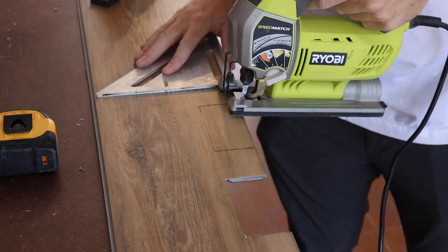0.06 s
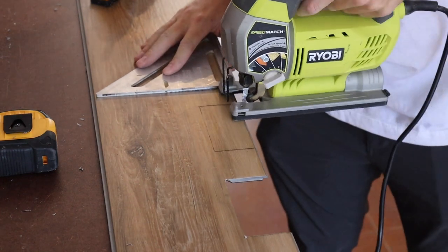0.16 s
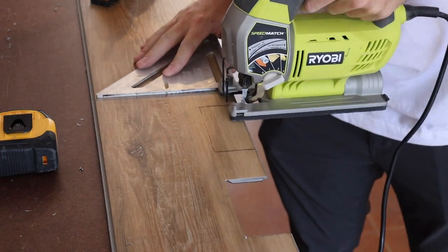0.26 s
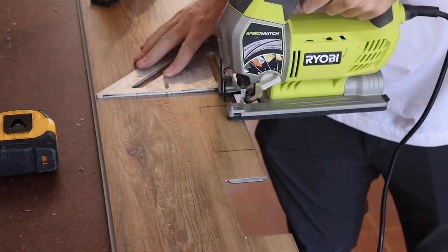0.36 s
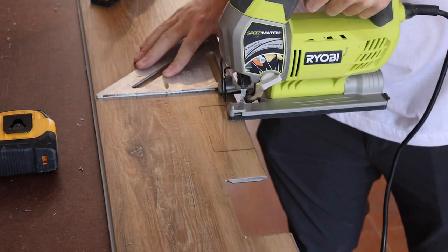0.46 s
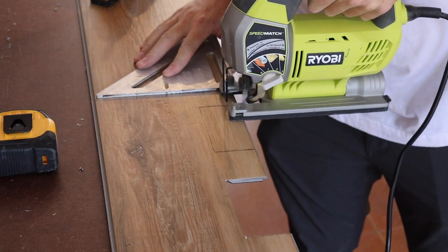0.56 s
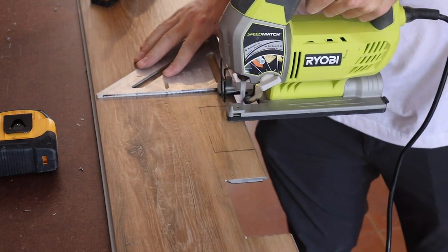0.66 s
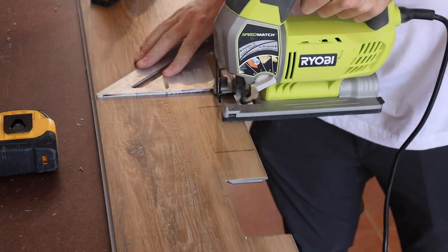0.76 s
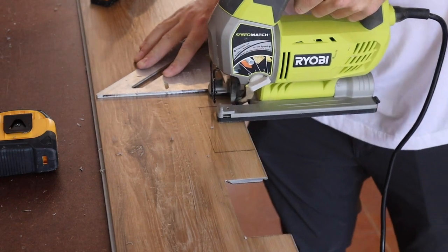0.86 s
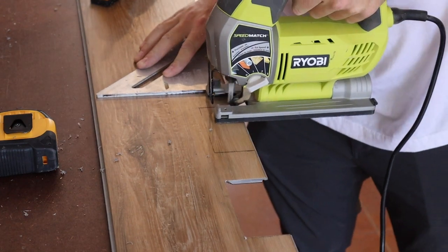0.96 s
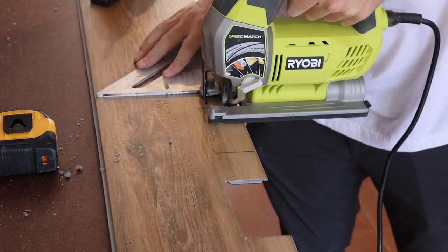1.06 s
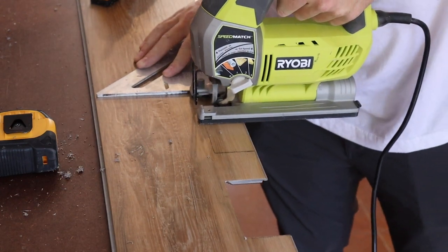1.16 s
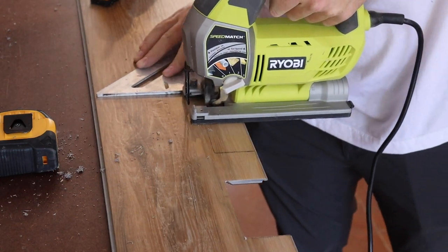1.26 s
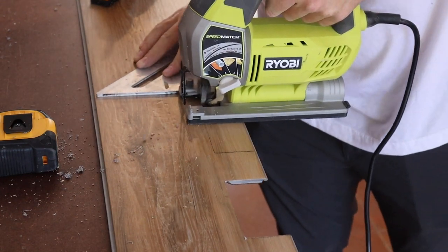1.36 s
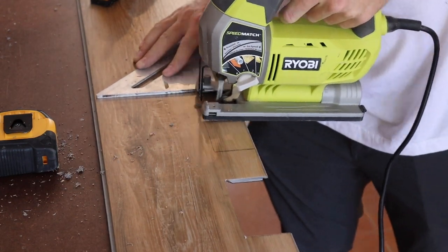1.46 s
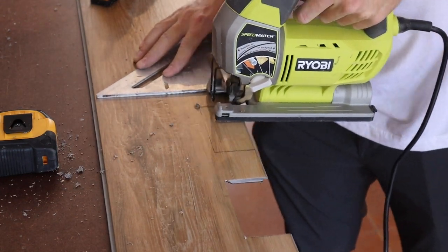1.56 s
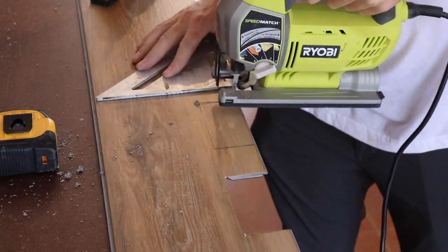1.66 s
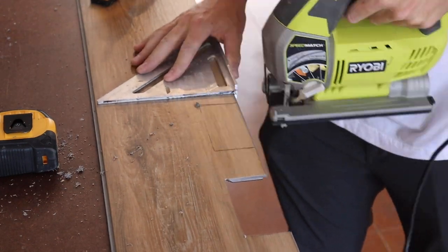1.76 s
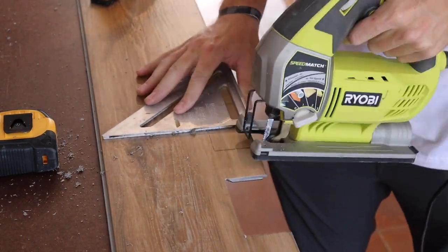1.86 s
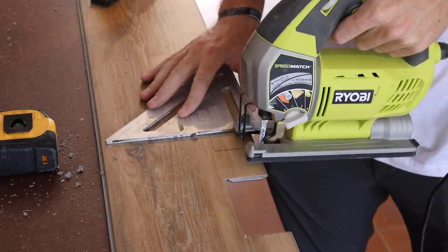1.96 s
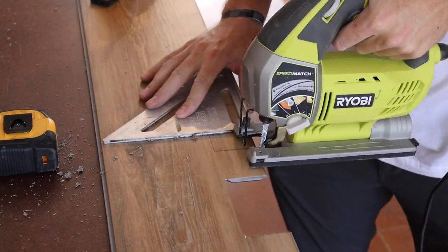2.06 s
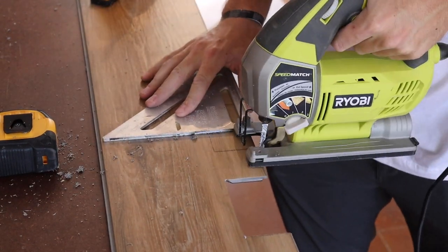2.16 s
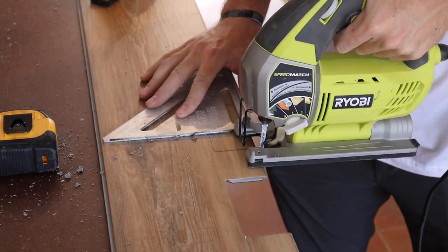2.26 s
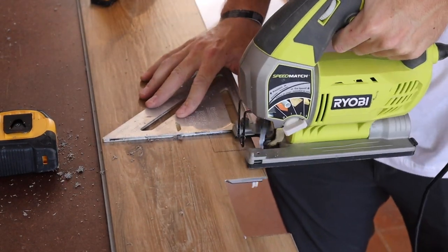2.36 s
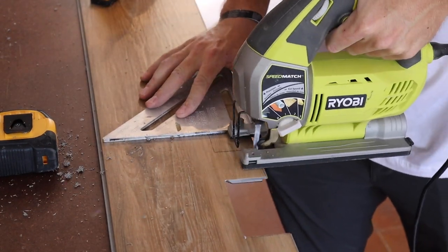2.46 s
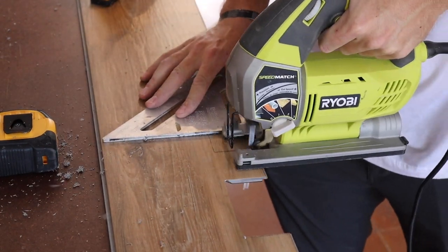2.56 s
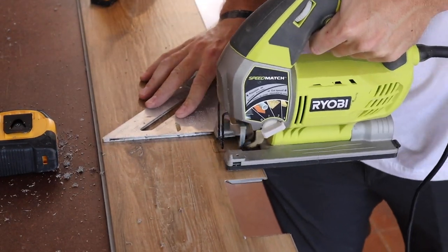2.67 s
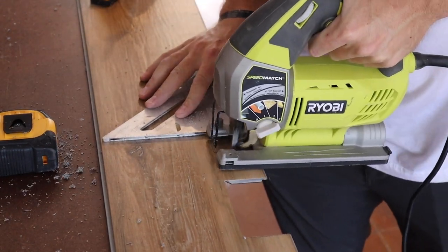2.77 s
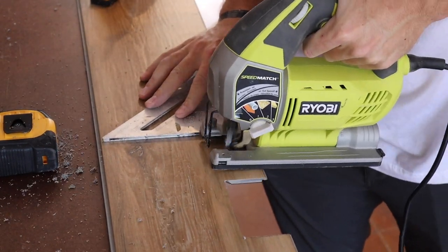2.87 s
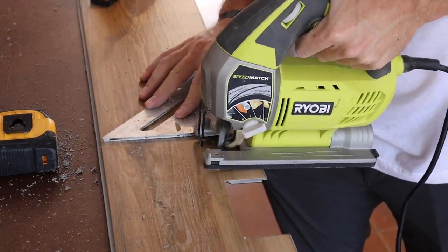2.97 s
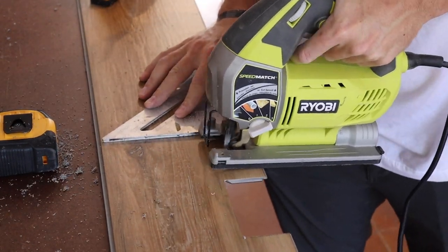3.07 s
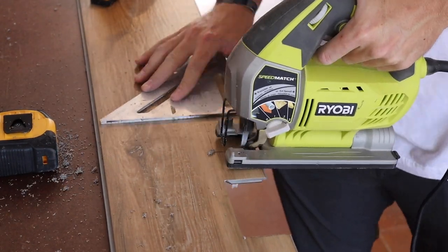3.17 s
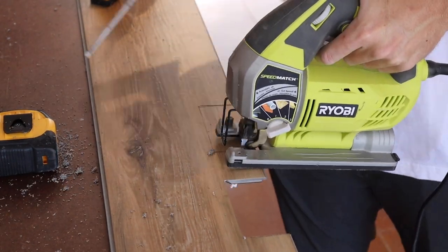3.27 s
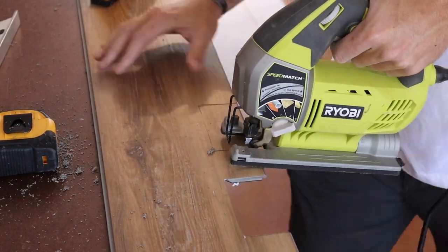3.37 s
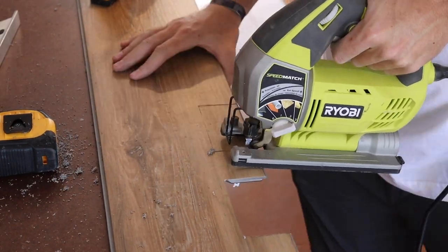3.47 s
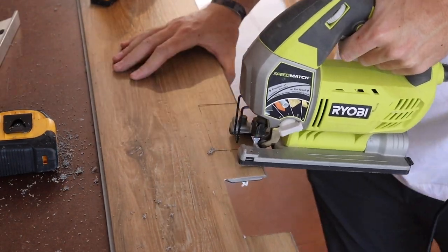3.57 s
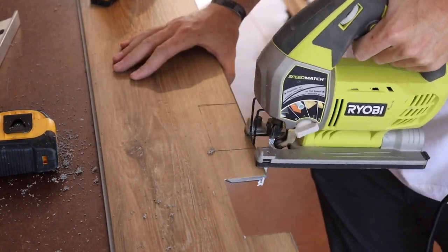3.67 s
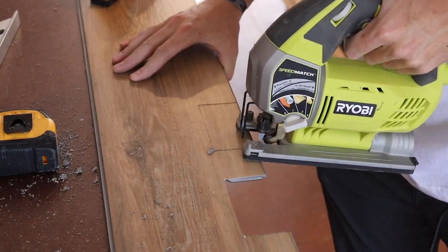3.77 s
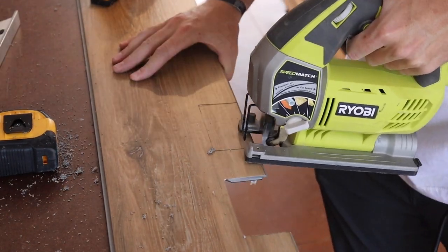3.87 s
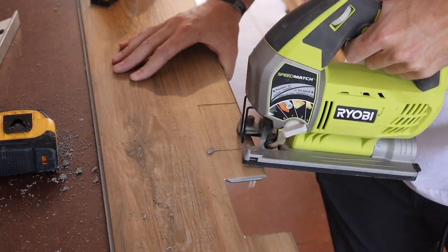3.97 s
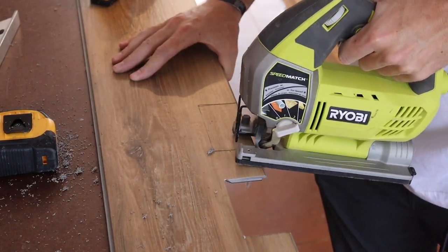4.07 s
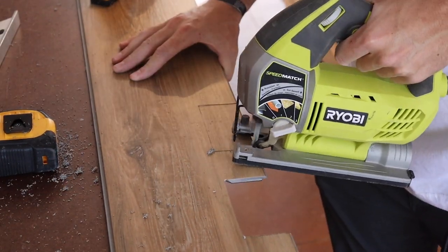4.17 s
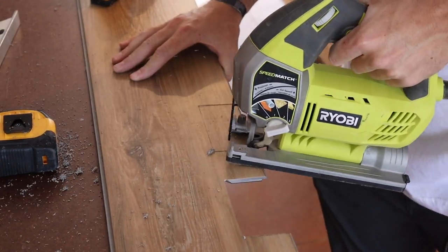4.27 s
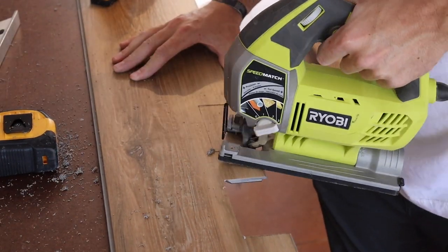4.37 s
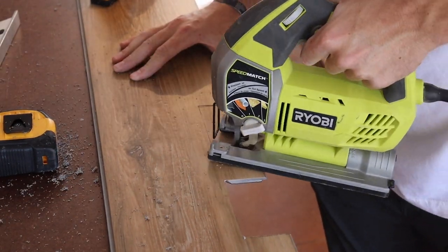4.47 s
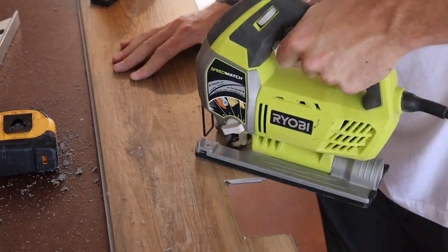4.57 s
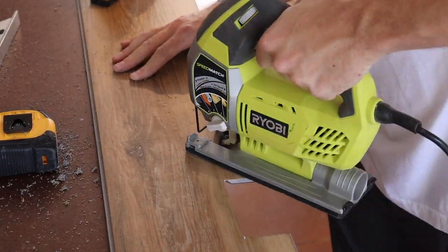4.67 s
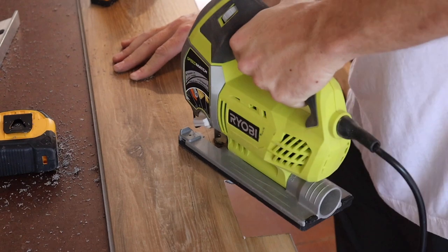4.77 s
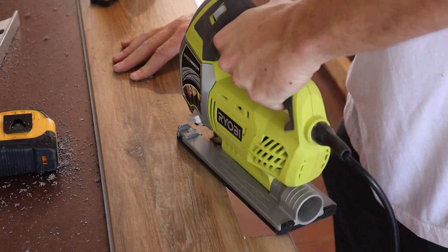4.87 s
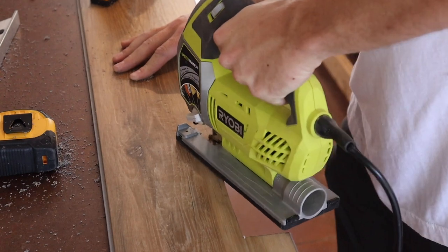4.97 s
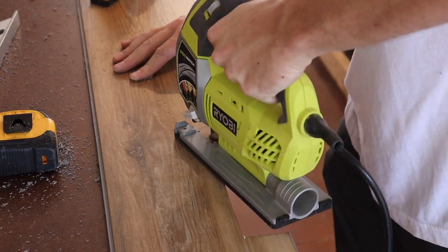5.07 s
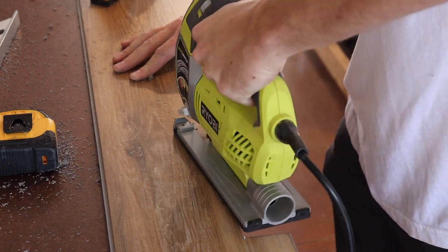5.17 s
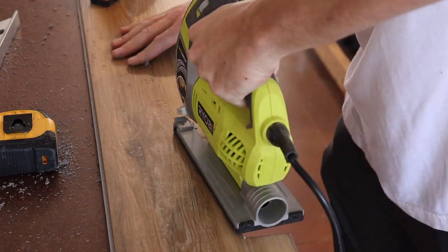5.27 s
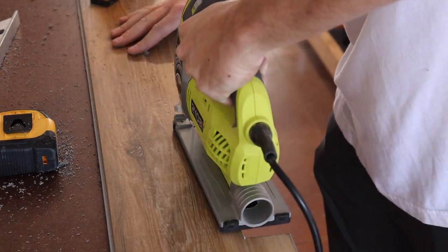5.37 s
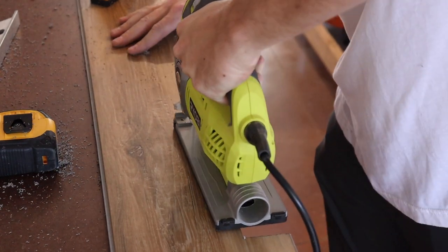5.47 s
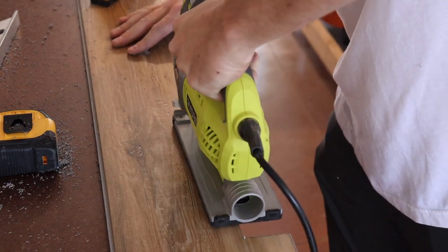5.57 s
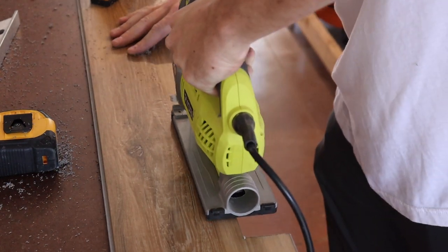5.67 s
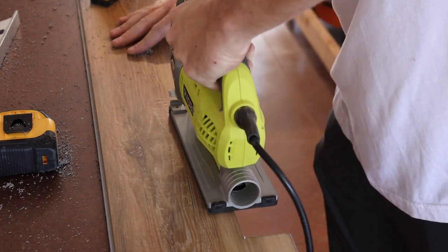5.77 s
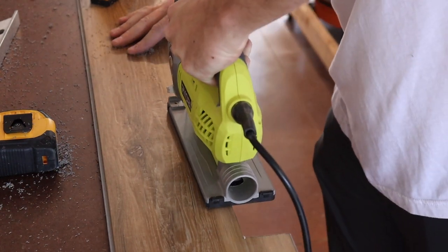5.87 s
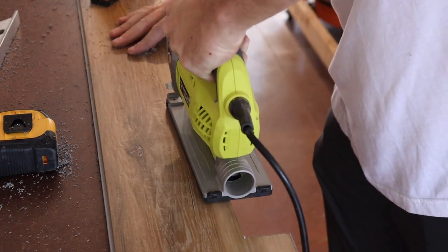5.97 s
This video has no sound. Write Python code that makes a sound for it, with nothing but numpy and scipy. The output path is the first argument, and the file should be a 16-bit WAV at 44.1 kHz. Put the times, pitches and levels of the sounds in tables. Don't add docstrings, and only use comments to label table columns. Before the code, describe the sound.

Faint handling ticks come first, then a jigsaw snaps on, rasps into a vinyl plank and winds down. Clicks and light rubbing follow, then a second, shorter cut, a sharp clack with a brief scrape, and softer taps. A third long cut labours lower, clacks once midway, and keeps buzzing. Recorded at arm's length, nearly centred, with little room echo.

```python
import sys
import numpy as np
from scipy import signal
from scipy.io import wavfile
from scipy.ndimage import uniform_filter1d

SR = 44100
rng = np.random.default_rng(int(sys.argv[2]) if len(sys.argv) > 2 else 0)


def amplitude_ratio(level_db):
    exponent = np.asarray(level_db, float) / 20
    return 10 ** exponent


def to_wav(sig):
    pcm = np.clip(np.atleast_2d(sig), -1, 1) * 32767
    pcm = np.round(pcm).astype(np.int16)
    wavfile.write(sys.argv[1], SR, pcm.T)


N = 265041
T = np.arange(N) / SR
FRAME_T, BIN_HZ = np.arange(N // 128 + 5) * 128 / SR, np.fft.rfftfreq(512, 1 / SR)

# pressed t/s, released t/s, coasting/s, fan hiss level/dB, gear whine level/dB
BURSTS = [
    (.607, 1.475, .32, -30.5, -38),
    (2.356, 3.1, .305, -30, -44.5),
    (3.899, 7, .3, -30, -39),
]
FREE_HZ = 280

# f/Hz, level/dB, t60/s
BENCH = [
    (435, 0, .27),
    (595, -2, .09),
    (330, -9, .04),
    (505, -8, .05),
]


def evened(x):
    return x / np.sqrt(np.mean(x ** 2) + 1e-20)


def read(points, at):
    f, value = np.transpose(points)
    return np.interp(np.log(at + 1), np.log(f + 1), value)


def band(x, lo_hz, hi_hz):
    edges = np.clip([lo_hz, hi_hz], 10, 21000)
    return signal.sosfilt(signal.butter(3, edges, "band", fs=SR, output="sos"), x)


def resonate(x, hz, width):
    turn = np.exp(2j * np.pi * np.cumsum(hz * np.ones(len(x))) / SR)
    r = np.exp(-np.pi * width / SR)
    return 2 * (turn * signal.lfilter([1 - r], [1, -r], x / turn)).real


def wander(t, per_s):
    steps = uniform_filter1d(rng.standard_normal(450), size=3)
    return evened(np.interp(t, np.arange(450) / per_s, steps))


def swell(t, start, end, fade_s):
    return np.clip(np.minimum(t - start, end - t) / fade_s, 0, 1)


def noise(db, patchy_db):
    a, b, patches = rng.standard_normal((len(FRAME_T), len(BIN_HZ), 3)).T
    patches = uniform_filter1d(patches, size=5, axis=0)
    patches = evened(uniform_filter1d(patches, size=20, axis=1))
    field = (a + 1j * b) * amplitude_ratio(db + patchy_db * patches)
    return signal.istft(field, nperseg=512, noverlap=384)[1][:N]


def drive(on, off, coast):
    # t/s, stroke rate f/Hz, push on the plank level/dB, gear load level/dB
    cuts = [
        [(.75, 291, -66, 2.5), (.85, 289, -65, -3.5), (.93, 283.5, -64, 0.5), (1.1, 283.7, -57.5, -0.5),
         (1.21, 273.2, -53, 2), (1.31, 273, -51, -3.5), (1.48, 280.4, -56.5, -2)],
        [(2.5, 284.7, -63.5, 6), (2.57, 282.2, -59.5, -5), (2.64, 279.4, -54, 3), (2.72, 274.9, -52, 3.5),
         (2.87, 273.2, -47, -1), (3.05, 271.3, -47.5, 3.5), (3.1, 273.7, -54.5, -3)],
        [(4.1, 282.3, -76, -1.5), (4.23, 280, -85, -10), (4.31, 276.9, -57, -2.5), (4.5, 270.2, -47, 1.5),
         (4.6, 267.4, -46.5, 3.5), (4.68, 261.6, -55, -5), (4.77, 261.3, -53.5, -5), (4.86, 251.8, -56.5, -9)],
        [(4.94, 253, -56.5, -4), (5.04, 271.2, -59, -1), (5.13, 273.3, -59, -2.5), (5.22, 269.5, -57, 3),
         (5.3, 266.5, -59, 0), (5.4, 269.4, -59.5, 3), (5.6, 272, -64, 4.5), (5.8, 262.4, -53, -0.5),
         (6.01, 265.5, -51, 3.5)],
    ]
    span = slice(round(on * SR), min(round((off + .96 * coast) * SR), N))
    t = T[span]
    s, *controls = np.transpose(sum(cuts, []))
    share = 1 - np.maximum(t - off, 0) / coast
    return span, t, share, *(np.interp(t, s, c) for c in controls)


def blade(t, line, throb_db, bite):
    bite_db = -28 + 0.43 * throb_db + 1.15 * np.tanh(2 * wander(t, 8.2))
    buzz = amplitude_ratio(throb_db) * line(2, 0)
    for k in range(1, 45):
        if k == 2:
            continue
        held_db = bite_db if k < 12 else 0.38 * bite_db - 29.0
        flutter_db = (2.4 + .04 * k) * wander(t, 14)
        buzz += amplitude_ratio(read(bite, k) + held_db + flutter_db) * line(k, .003 + .00006 * k)
    return buzz


def gears(t, turn, line, whine_db, gear):
    teeth_per_stroke = 9.75
    beat = 1 + .15 * np.cos(np.pi / 2 * turn)
    whine = np.zeros(len(t))
    for k, db in enumerate(gear, start=1):
        whine += amplitude_ratio(db + whine_db + 2.2 * wander(t, 30)) * beat * line(k * teeth_per_stroke, .003)
    return whine


def singing(t, line):
    # start t/s, end t/s, multiple of the stroke rate, level/dB
    spells = [(1.1, 1.38, 4, -52), (1.05, 1.35, 9, -41), (.85, 1.1, 9, -50), (1.3, 1.5, 9, -44),
              (1.05, 1.48, 11, -50), (2.48, 3.1, 29.25, -48), (1.05, 1.47, 6, -54), (1.18, 1.47, 37, -46),
              (5.07, 5.19, 2, -49), (1.2, 1.46, 18, -48), (1.17, 1.48, 19.5, -45), (1.1, 1.48, 29.25, -46),
              (.75, 1.14, 15, -51), (3.94, 4.7, 7, -56), (3.0, 3.14, 7, -48), (4.06, 4.27, 13, -45.5),
              (4.28, 4.5, 14, -48), (4.1, 4.45, 15, -50), (4.35, 4.65, 19, -47), (4.45, 4.62, 20, -48),
              (4.4, 4.64, 21, -43), (4.35, 4.55, 28, -45), (4.42, 4.66, 6, -51), (5.2, 5.45, 4, -55),
              (5.62, 5.9, 4, -56), (4.55, 5.0, 19.5, -48), (4.95, 6.1, 19.5, -42.5), (4.28, 4.68, 10, -51),
              (5.66, 6.1, 10, -49), (.72, 1.45, 5, -55)]
    song = np.zeros(len(t))
    for start, end, multiple, db in spells:
        if t[0] < start < t[-1]:
            slack = .003 + .00006 * multiple * (multiple % 1 == 0)
            song += amplitude_ratio(db - 2.5 + 2.5 * wander(t, 40)) * swell(t, start, end, .07) * line(multiple, slack)
    return song


def folded(t, turn):
    # start t/s, end t/s, multiple of the stroke rate, level/dB
    spells = [
        (.74, 1.2, 117, -42),
        (1.33, 1.48, 117, -41),
        (2.46, 2.74, 117, -39),
        (2.72, 3.1, 119, -43),
        (4.06, 4.34, 117, -46),
    ]
    converter_hz = 48000
    tones = np.zeros(len(t))
    for start, end, multiple, db in spells:
        tone = np.cos(2 * np.pi * (converter_hz * t - multiple * turn))
        tones += amplitude_ratio(db + 2 * wander(t, 30)) * swell(t, start, end, .05) * tone
    return tones


def strokes():
    # multiple of the stroke rate, level against the bite/dB
    bites = [
        [(1, -22), (3, -18), (4, -10), (6, -8), (7, -16), (9, -3), (12, -9), (15, -3), (17, -10), (23, -7),
         (26, -11), (33, -10), (38, -4), (44, -11)],
        [(1, -24), (3, -18), (4, -13), (6, -6), (8, -17), (9, -2), (12, -9), (13, -1), (14, -8), (24, -8),
         (29, -13), (35, -11), (38, -4), (44, -11)],
        [(1, -16), (3, -19), (4, -11), (5, -4), (7, -9), (8, -18), (9, -7), (11, -12), (13, -4), (17, -11),
         (26, -17), (28, -11), (30, -17), (44, -23)],
    ]
    # level/dB of the tooth rate and of its multiples 2, 3, 4, 5
    gear_rows = [
        (-4.5, -8, -7.5, -24, -16),
        (-3, -1, -12, -20, -9),
        (-3, -7, -5, -12, -15),
    ]
    spin_up_s, whine_db_per_hz = .042, 0.3
    out, turns = np.zeros(N), np.zeros(N)
    for (on, off, coast, _, gear_db), bite, gear in zip(BURSTS, bites, gear_rows):
        span, t, share, hz, throb_db, load_db = drive(on, off, coast)
        hz = hz * share * (1 - np.exp((on - t) / spin_up_s))
        turns[span] = turn = np.cumsum(hz * (1 + 0.00121 * wander(t, 60))) / SR
        play, phases = wander(t, 65), rng.random(200)

        def line(multiple, slack):
            phase = phases[round(4 * multiple)]
            return np.cos(2 * np.pi * (multiple * (turn + slack * play) + phase))

        whine_db = gear_db + load_db + whine_db_per_hz * (hz - FREE_HZ)
        buzz = blade(t, line, throb_db, bite) + gears(t, turn, line, whine_db, gear)
        buzz += singing(t, line) + folded(t, turn)
        onset = np.minimum((t - on) / 0.055, 1) ** 2
        out[span] = np.sqrt(2) * buzz * onset * amplitude_ratio(-350 * np.maximum(t - off, 0))
    return out, turns


def steady(x, ref):
    return x / np.sqrt(uniform_filter1d(ref ** 2, size=20000) + 1e-20)


def motor(turns):
    # f/Hz, level per Hz/dB
    side_on = [(18, -45), (30, -19), (600, -21), (1300, -17.5), (2300, -8), (2900, -1), (5300, -3),
               (6200, -3), (8700, -5), (10300, 1), (12000, -3.5), (15700, -2)]
    # f/Hz, level per Hz/dB
    from_behind = [(18, -50), (30, -18), (264, -19), (640, -17), (1300, -17.5), (2040, -13.5),
                   (2700, -13.5), (5200, -7.5), (6300, -12.5), (7600, 1.5), (8600, -3), (11000, -2),
                   (15700, -2)]
    # t/s, share heard from behind
    turning = [
        (4.4, 0.23),
        (4.85, 0.8),
    ]
    behind = np.interp(FRAME_T, *np.transpose(turning))
    colour_db = np.outer(read(side_on, BIN_HZ), 1 - behind) + np.outer(read(from_behind, BIN_HZ), behind)
    air = noise(colour_db, patchy_db=1.0)
    grit = amplitude_ratio(1.5 * evened(uniform_filter1d(rng.standard_normal(N), size=30)))
    puff = (1 + 0.028 * np.cos(2 * np.pi * turns)) * grit
    hiss, rattle = band(air, 7030, 18700) * puff, band(air, 1660, 6600) * puff
    hiss, rattle = steady(hiss, hiss), steady(rattle, rattle)
    rumble = band(air, 6.7, 2154)
    rumble = steady(rumble, band(rumble, 460, 1067))
    casing_hz, casing_width_hz = 2600, 450
    out = np.zeros(N)
    for on, off, coast, db, _ in BURSTS:
        span, t, share, hz, *_ = drive(on, off, coast)
        db = db + 0.09 * (hz - FREE_HZ)
        db += -20 * np.exp((on - t) / 0.023) + 7.5 * np.exp((on - t) / 0.078)
        db += -0.5 * np.clip((t - off) / 0.01, 0, 1) + 18 * np.log10(share)
        db += 0.28 * (1 - share) * wander(t, 28.1)
        casing = resonate(air[span], casing_hz, casing_width_hz)
        casing = evened(resonate(casing, casing_hz, casing_width_hz))
        casing *= amplitude_ratio(-16) * np.clip((t - off) / 0.069, 0, 1) * share
        late, turned = (1 - share) ** 2, np.interp(t, *np.transpose(turning))
        rattle_db = -7 + 7.5 * late
        rumble_db = -30 + 10.5 * late + 2.5 * turned
        mix = hiss[span] + casing + amplitude_ratio(rattle_db) * rattle[span] + amplitude_ratio(rumble_db) * rumble[span]
        out[span] = amplitude_ratio(db) * np.minimum((t[-1] - t) / .015, 1) * mix
    return out


def run_downs():
    # f at full speed/Hz, level/dB, speed share where loudest, spread in speed share
    coasting = [
        (17400, -47.5, .5, .36),
        (2650, -52.5, .95, .17),
    ]
    width_hz = 220
    out, share = np.zeros(N), np.linspace(1, .16, num=17)
    for on, off, coast, *_ in BURSTS[:2]:
        s = off + (1 - share) * coast
        span = slice(round(s[0] * SR), min(round(s[-1] * SR), N))
        for full_hz, peak_db, loudest, spread in coasting:
            hz = np.interp(T[span], s, full_hz * share)
            db = np.interp(T[span], s, peak_db - 6 * ((share - loudest) / spread) ** 2)
            fuzz = resonate(rng.standard_normal(len(hz)), hz, width_hz)
            fuzz = evened(resonate(fuzz, hz, width_hz))
            out[span] += amplitude_ratio(db) * fuzz * signal.windows.tukey(len(hz), .15)
    return out


def ring(modes, t, detune=1):
    return sum(amplitude_ratio(db - 60 * t / t60) * np.sin(2 * np.pi * hz * detune * t) for hz, db, t60 in modes)


def knocks():
    # t/s, tick peak level/dB, bench knock level/dB, metal clink level/dB, tick
    # t60/s
    hits = [(0.0469, -31.5, -49, -54, 0.1), (0.1119, -31.5, -46.5, -64, 0.047),
            (0.279, -57, -70, -71, 0.04), (0.4308, -40.5, -60, -59, 0.043),
            (0.6062, -42, -61.5, -56, 0.039), (1.7246, -45, -55, -56, 0.019),
            (1.7525, -30.5, -47, -49, 0.044), (1.7855, -39, -66, -58, 0.04),
            (1.8135, -24.5, -66, -64, 0.022), (1.8204, -40, -54, -58, 0.011),
            (1.955, -34.5, -52, -56, 0.045), (2.0402, -35, -77, -66, 0.067),
            (2.051, -30.5, -46.5, -55, 0.07), (2.0935, -25, -52.5, -72, 0.066),
            (2.149, -43, -62, -65, 0.04), (2.355, -34, -58, -60, 0.07), (2.3702, -13, -55, -46, 0.059),
            (3.392, -11.5, -46.5, -43, 0.039), (3.4183, -16, -48.5, -39.5, 0.084),
            (3.521, -38.5, -71, -76, 0.07), (3.7314, -38.5, -55.5, -57, 0.084),
            (3.8952, -28, -62, -68, 0.04), (4.8077, -15, -56, -47, 0.033), (4.8181, -20, -52.5, -42, 0.064)]
    # f/Hz, level/dB, t60/s
    metal = [
        (948, -11, 0.15),
        (1080, 3.5, 0.092),
        (1473, -0.5, 0.04),
    ]
    out, t = np.zeros(N + SR), np.arange(SR // 3) / SR
    rise = 1 - np.exp(-t / .0025)
    for s, tick_db, bench_db, metal_db, t60 in hits:
        crack, detune = rng.standard_normal(len(t)), rng.uniform(0.92, 1.03)
        decay = amplitude_ratio(-60 * t / 0.0021) + 0.46 * amplitude_ratio(-60 * t / max(t60, .005))
        tick = band((t == 0) + crack * decay, 1450, 12400)
        thud = amplitude_ratio(0.5 - 60 * t / 0.043) * evened(band(crack, 314, 1520))
        hit = amplitude_ratio(tick_db - 8.5) * tick
        hit += amplitude_ratio(bench_db + 4) * rise * (ring(BENCH, t) + thud)
        hit += amplitude_ratio(metal_db - 1.5) * ring(metal, t, detune)
        out[round(s * SR):][:len(t)] += hit
    return out[:N]


def scrapes():
    # start t/s, length/s, level/dB, dull part below about 3 kHz level/dB, fade by the end/dB
    slides = [
        (0.028, 0.081, -56, 6, -8),
        (1.816, 0.03, -34.5, -20, -34),
        (1.85, 0.084, -38.5, -11.5, -9),
        (3.396, 0.051, -19.5, -9, -37),
        (4.797, 0.03, -30, -5.5, -7),
    ]
    out = np.zeros(N)
    for start, length, db, dull_db, fade_db in slides:
        u = np.arange(0, length, 1 / SR) / length
        grains = rng.standard_normal(len(u)) * amplitude_ratio(2.9 * wander(u * length, 1390))
        rub = evened(band(grains, 4000, 16000)) + amplitude_ratio(dull_db) * evened(band(grains, 450, 3400))
        out[round(start * SR):][:len(u)] += amplitude_ratio(db - 9 + fade_db * u ** 3) * rub * np.minimum(u / 0.062, 1)
    return out


def bench_hum():
    # start t/s, end t/s, level/dB
    drags = [
        (1.482, 1.738, -59.5),
        (3.109, 3.386, -58),
    ]
    out = np.zeros(N)
    for start, end, db in drags:
        count = len(np.arange(0, end - start, 1 / SR))
        is_bump = rng.random(count) < 70 / SR
        bumps = rng.standard_normal(count) * (.12 + is_bump * 4)
        hum = evened(resonate(bumps, BENCH[0][0], 13))
        out[round(start * SR):][:count] += amplitude_ratio(db) * hum * signal.windows.tukey(count, .6)
    return out


def room():
    # f/Hz, level/dB
    colour = [(60, -29), (200, -3.5), (300, -11.5), (436, -0.5), (700, -9), (1800, -9.5), (2400, -10),
              (8000, -16), (16000, -19)]
    # f/Hz, width/Hz, level/dB
    hums = [
        (858, 10, -77),
        (2200, 55, -83.5),
        (8600, 60, -83),
    ]
    air = noise(read(colour, BIN_HZ)[:, None], patchy_db=.7)
    out = amplitude_ratio(-64) * evened(band(air, 90, 20000))
    for hz, width, db in hums:
        out += amplitude_ratio(db) * evened(resonate(rng.standard_normal(N), hz, width))
    return out


def scene():
    buzz, turns = strokes()
    mid = buzz + motor(turns) + run_downs() + knocks() + scrapes() + bench_hum() + room()
    side = amplitude_ratio(-16.5) * room()
    return np.array([mid + side, mid - side])


def band_limit(x):
    return signal.sosfilt(signal.butter(12, 17010, fs=SR, output="sos"), x)


def record(dry):
    edge_hz = 15780
    slips = rng.random((N // 1024 + 2, 14)) < .012
    slips[:, :3] = False
    block = (FRAME_T * SR).astype(int) // 1024
    band_of_bin = np.minimum(BIN_HZ // 1600, 13).astype(int)
    mask = slips[block][:, band_of_bin].T
    loud = np.sqrt(uniform_filter1d(dry.mean(0) ** 2, size=2048) + 1e-20)
    patches = evened(noise(np.where(mask, 0., -120.), patchy_db=1))
    apart = amplitude_ratio(-19.5) * loud * (loud > .01) * patches
    edge = signal.firwin(511, edge_hz, window=("kaiser", 9), fs=SR)
    mix = signal.oaconvolve(dry + [apart, -apart], edge[None], "same")
    return band_limit(mix)


dry = scene()
out = record(dry)
to_wav(out)
```